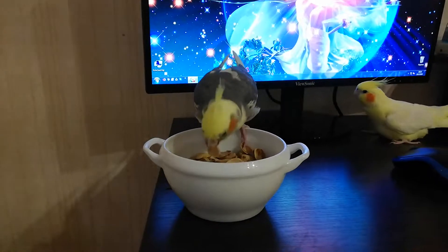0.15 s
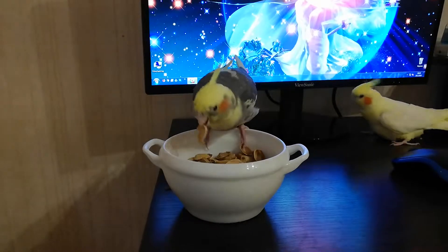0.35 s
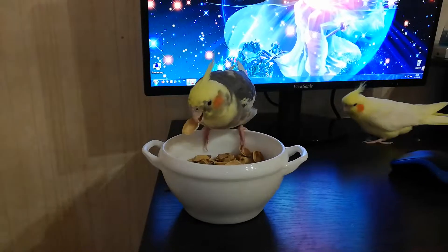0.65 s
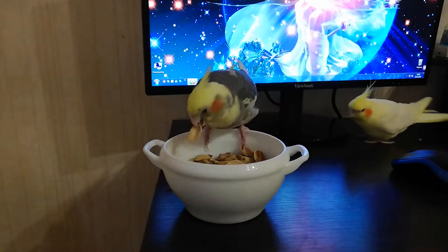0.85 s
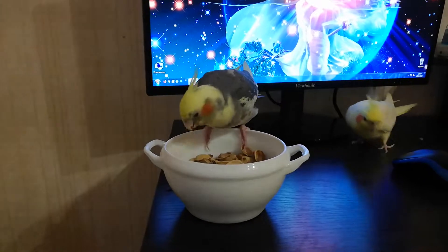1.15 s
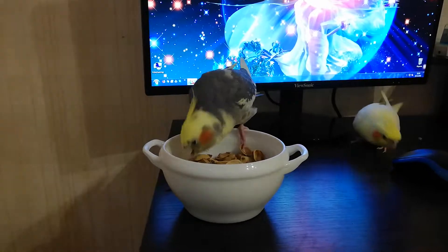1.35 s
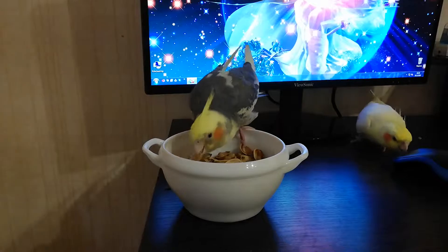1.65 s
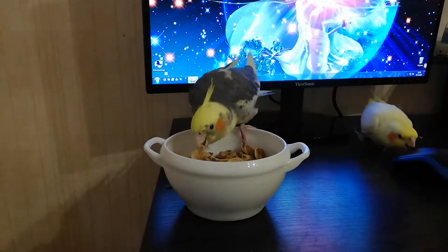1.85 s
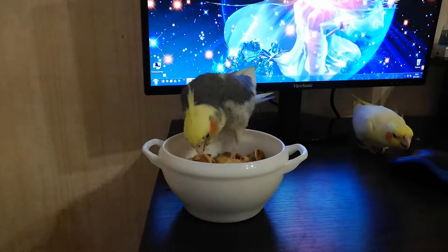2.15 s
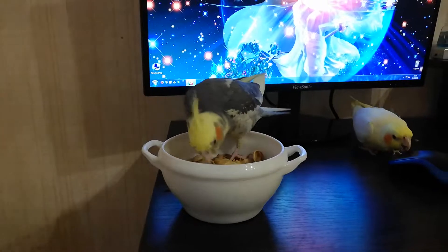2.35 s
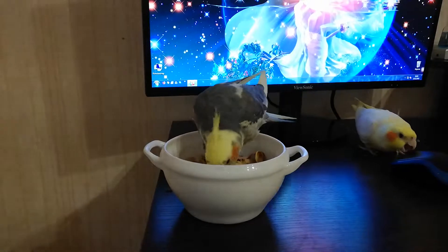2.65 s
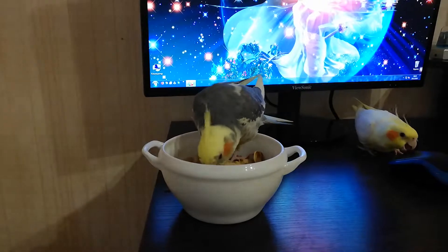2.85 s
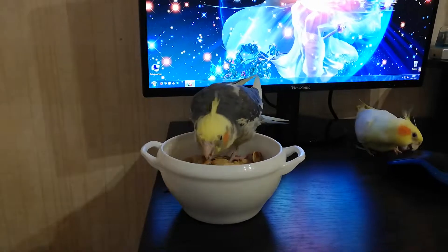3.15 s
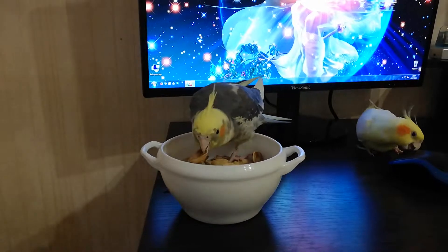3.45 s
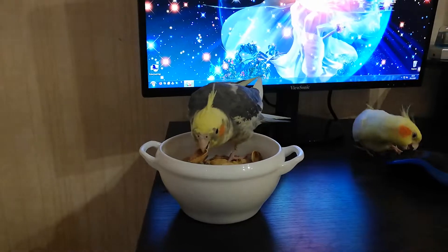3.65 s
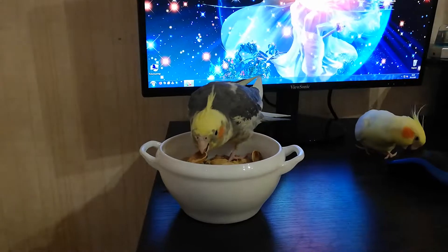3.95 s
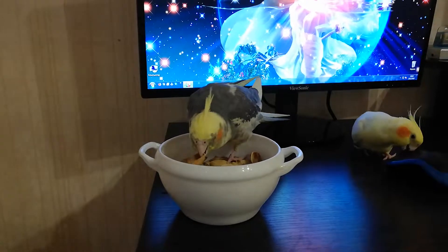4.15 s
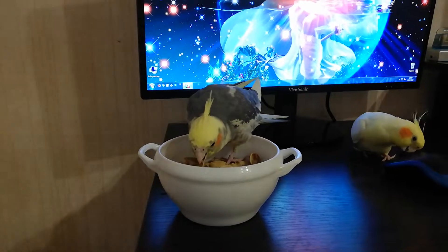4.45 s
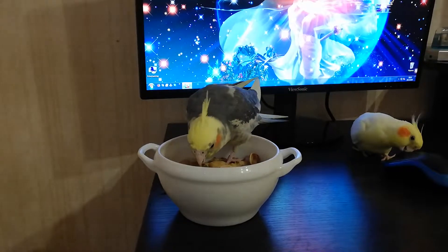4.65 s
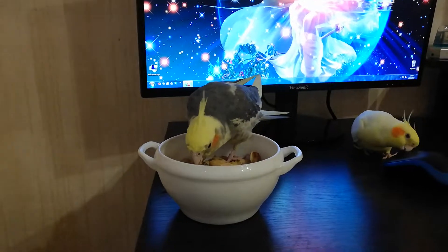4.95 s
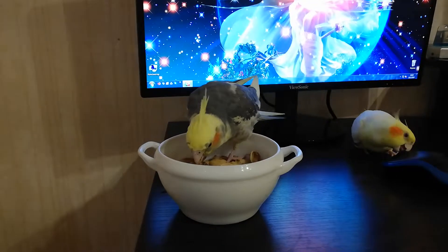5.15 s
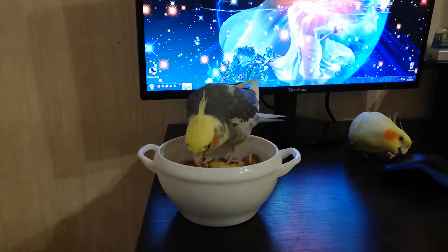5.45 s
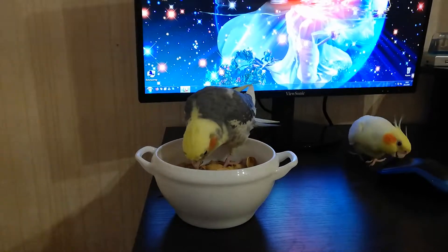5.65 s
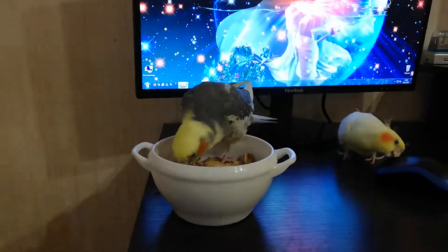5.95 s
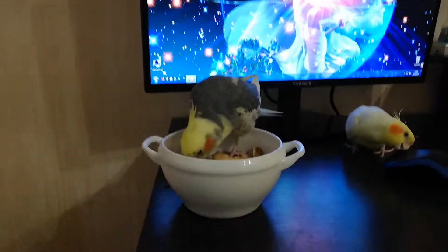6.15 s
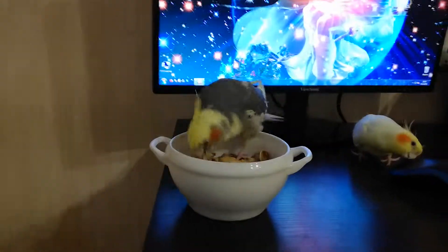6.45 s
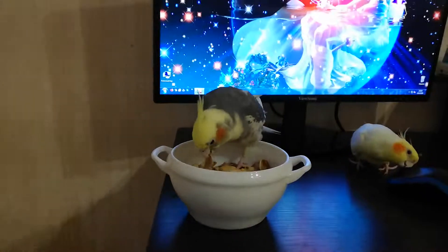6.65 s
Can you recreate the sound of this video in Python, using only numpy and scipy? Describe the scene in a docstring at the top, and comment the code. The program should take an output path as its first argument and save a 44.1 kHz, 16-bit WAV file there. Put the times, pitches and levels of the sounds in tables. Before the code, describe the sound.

Crisp beak cracks, grinding crumbs and faint glazed-bowl clinks in a quiet humming room, ending in thumps and scratchy rubs of handling.

```python
"""A small parrot cracks dry cereal over a glazed bowl on a desk: noise bursts crack, grains grind as crumbs,
and damped modes ring as its beak taps the rim. A hand-held phone hears the bird at its right port.
Near the left port fingers knock (damped swings), slip (noise bursts) and rub (grainy noise); the grip rumbles.
A second bird's steps are short noise bursts; fans hum and electronics whine as wavering sines in a small room.
"""
import sys
import numpy as np
from scipy import signal
from scipy.fft import rfft, irfft, next_fast_len
from scipy.io import wavfile
from scipy.ndimage import uniform_filter1d, map_coordinates

SR = 44100
rng = np.random.default_rng(int(sys.argv[2]) if len(sys.argv) > 2 else 0)


def boost_factor(decibels):
    """Convert a level in decibels to a linear amplitude factor."""
    exponent = np.asarray(decibels, float) / 20
    return 10 ** exponent


def to_wav(s):
    """Save 16-bit WAV."""
    ch = np.atleast_2d(s).T  # columns
    pcm = np.round(np.clip(ch, -1, 1) * 32767)  # PCM
    wavfile.write(sys.argv[1], SR, pcm.astype(np.int16))


N = 299880
TIME = np.arange(N) / SR

# tone of the room air: (frequency [Hz], relative level [dB])
AIR_TONE = [(53, -50), (90, -3.5), (215, -3.5), (404, -10.5), (461, -13.5), (866, -17), (3810, -23.5),
            (9920, -26.5), (16400, -31)]
# likeness of the air at the two ports: (frequency [Hz], correlation [-1 to 1])
AIR_LIKENESS = [(100, 0.82), (300, 0.37), (640, -0.54), (1400, -0.21)]
# tilt of the air between the ports: (frequency [Hz], left minus right [dB])
AIR_LEAN = [(300, 1), (700, -8), (3000, -1.5), (7000, -3), (11000, -14), (15500, -6)]
# computer fans: (frequency [Hz], central amplitude [dB])
FAN_HUM = [(118.4, -67), (161.5, -67.5), (209.9, -64.5)]
# whine of the electronics: (frequency [Hz], central amplitude at the right port [dB])
WHINE_TONES = [(6002, -79.5), (8000, -74.5), (10002, -77.5)]
# rumble of the hand's grip: (time [s], level [dB])
GRIP_RUMBLE = [(0, -60), (2.45, -64.5), (2.55, -55), (2.7, -63), (3.5, -62), (3.62, -50), (3.8, -63),
               (5.85, -57), (5.95, -38.5), (6.2, -40.5), (6.45, -45), (6.8, -60.5)]
# finger knocks on the case: (time [s], strength [dB], rocking frequency [Hz], push 1 or pull -1)
FINGER_KNOCKS = [(0.0855, -2.5, 77.5, -1), (0.101, -13, 71, -1), (0.1219, -9, 79, -1),
                 (0.159, -11, 76.5, -1), (0.5909, -12, 73.6, 1), (2.2406, -4, 74, 1),
                 (4.9234, -19.5, 47.4, -1), (5.3236, 0, 126, 1), (5.357, -15.5, 90, 1),
                 (5.4276, -7.5, 64, -1), (5.4478, -12, 64, -1), (5.4814, -7.5, 71, -1),
                 (5.5076, -9.5, 82.5, -1), (5.6345, -10.5, 75, -1), (5.676, -10, 54.3, -1),
                 (5.6899, -12, 86.4, 1), (5.7025, 0.5, 90.5, -1), (5.88, -13, 67.6, -1),
                 (5.9388, -10.5, 67.4, 1), (6.014, -4.5, 93, -1), (6.023, -5.5, 155, 1),
                 (6.0957, -13.5, 44.5, -1), (6.1092, -14, 55.3, 1), (6.293, 0.5, 110, 1),
                 (6.401, -19, 76, 1), (6.6173, -16, 71.4, 1)]
# crumbs grinding and rattling, ahead of the port: (start [s], end [s], level [dB])
CRUMB_STROKES = [(0.095, 0.276, -53.5), (1.188, 1.337, -42.5), (1.581, 1.742, -46.5), (2.122, 2.142, -29),
                 (2.209, 2.291, -34.5), (2.33, 2.5, -50), (2.645, 2.721, -43.5), (2.778, 3.01, -55.5),
                 (3.029, 3.124, -45.5), (3.121, 3.186, -40.5), (3.177, 3.32, -35), (3.456, 3.623, -58.5),
                 (4.174, 4.26, -53), (4.295, 4.36, -41.5), (4.464, 4.512, -53), (4.552, 4.623, -55.5),
                 (4.63, 4.726, -43), (5.92, 6.03, -56.5), (6.328, 6.39, -41), (6.443, 6.669, -50)]
# beak taps on the glaze: (time [s], strength [dB])
BEAK_TAPS = [(2.154, -44), (2.247, -39.5), (3.188, -28), (3.245, -46), (4.632, -50.5)]
# ringing modes of the bowl: (frequency [Hz], strength [dB], t60 [s])
BOWL_MODES = [(1463, -25, .12), (3833, -8, 0.17), (6530, 5.5, 0.073), (9700, 1.5, 0.096), (10700, 3, 0.097)]
# shell cracks, ahead of the port: (time [s], peak level [dB])
SHELL_CRACKS = [(0.1832, -22), (.254, -31.5), (1.191, -4.5), (1.2002, -15.5), (1.204, -11), (1.214, -23),
                (1.38, -35), (1.5795, -36), (1.602, -32), (1.646, -27), (1.692, -27), (1.7862, -31.5),
                (1.815, -35), (2.154, -30), (2.1614, -15), (2.1894, -4), (2.2155, -22), (2.241, -22),
                (2.2477, -19), (2.376, -19.5), (2.4486, -22), (2.6695, -22), (3.0552, -22.5),
                (3.1649, -20.5), (3.1852, -7), (3.27, -25), (3.578, -31), (4.1728, -12), (4.2227, -22.5),
                (4.275, -26), (4.313, -19), (4.332, -18.5), (4.6284, -16), (4.6373, -18.5), (6.492, -36),
                (6.505, -32), (6.531, -30), (6.6035, -29)]
# a soft puff in two colours: (start [s], end [s], level [dB], colour [Hz])
SOFT_PUFF = [(.61, .74, -50.5, 13400), (.62, .75, -58.5, 3540)]
# second bird's feet on the desk, ahead of the port: (time [s], peak level [dB])
FOOTSTEPS = [(1.726, -48), (1.79, -50), (1.907, -46), (2.351, -45), (3.535, -46.5), (3.99, -50.5)]
# skin slipping near the left port: (time [s], peak level [dB], colour [Hz])
SKIN_SLIPS = [(2.241, -29, 1400), (5.3235, -22, 1490), (5.3496, -21, 2600), (5.52, -31, 2000),
              (5.6563, -23.5, 2200), (5.6595, -21, 905), (5.6848, -20, 1850), (5.69, -14, 2400),
              (5.694, -14, 1800), (5.697, -14, 3200), (5.699, -13.5, 1200), (5.7046, -11, 3200),
              (5.7069, 1.5, 1600), (5.7094, -6.5, 1800), (5.715, -13, 4000), (5.7196, -15.5, 3000),
              (5.7395, -28, 2200), (5.7882, -12, 8040), (5.8764, -25.5, 6900), (5.92, -29, 1500),
              (5.928, -27.5, 1500), (5.935, -25, 1000), (5.9419, -19.5, 870), (5.951, -25, 1500),
              (6.0109, -12.5, 1310), (6.0175, -14, 2300), (6.0844, -17.5, 4000), (6.09, -21.5, 3500),
              (6.2519, -17, 1960), (6.2568, -17, 2400), (6.295, 0, 1800), (6.3304, -14, 3000),
              (6.3334, -12, 1000), (6.354, -23, 2200), (6.363, -5, 3000), (6.3827, -21.5, 1060)]
# fingertip rubbing: (start [s], end [s], level [dB], colour [Hz])
FINGER_RUBS = [(5.335, 5.37, -51.5, 2570), (5.515, 5.61, -52.5, 3600), (5.668, 5.73, -28, 3600),
               (5.67, 5.79, -43, 9700), (5.775, 5.795, -37, 9700), (5.86, 5.97, -55.5, 6950),
               (5.92, 6.0, -41, 1600), (5.98, 6.016, -30, 2100), (6.01, 6.06, -47, 2980),
               (6.062, 6.102, -34, 4000), (6.09, 6.23, -52.5, 1830), (6.2, 6.3, -42, 2900),
               (6.305, 6.41, -38, 3100)]
# resonances of the right port: (frequency [Hz], sharpness Q, gain [dB])
PORT_RESONANCES = [(8310, 13, -6), (10130, 12, -4)]
# decay of the room: (frequency [Hz], t60 [s])
ROOM_DECAY = [(1000, 0.98), (6000, 0.3), (14000, 0.26)]


def unit(x):
    """Scaled to rms 1."""
    return x / np.sqrt(np.mean(x ** 2) + 1e-20)


def along(points, hz):
    """(Hz, value) points read on a log frequency axis."""
    f, v = np.transpose(points)
    return np.interp(np.log(hz + 1), np.log(f + 1), v)


def wobble(rate):
    """A smooth random curve with rate knots a second, 40 at most."""
    knots = rng.standard_normal(int(N * 40 / SR) + 4)
    return map_coordinates(knots, [TIME * min(rate, 40)])


def filtered(x, response):
    """x shaped by a complex response of frequency."""
    m = next_fast_len(x.shape[-1] + 8192)
    spectrum = rfft(x, m) * response(np.fft.rfftfreq(m, 1 / SR))
    return irfft(spectrum, m)[..., :x.shape[-1]]


def resonance(hz, q):
    """A causal band around hz."""
    return lambda f: 1j * f * hz / q / (hz * hz - f * f + 1j * f * hz / q)


def hollow(hz, q):
    """A causal low-pass with a hump at hz; the slowest pressure leaks away."""
    def response(f):
        hump = hz * hz / (hz * hz - f * f + 1j * f * hz / q)
        leak = 1j * f / (260 + 1j * f)
        return hump ** .72 * np.sqrt(leak)
    return response


def heaped(hz, q):
    """A broad band at hz over the lower body of the heap of food in the bowl."""
    return lambda f: resonance(hz, q)(f) + .3 * resonance(3950, 2.2)(f)


def add(track, s, sound):
    """Mixes a sound in at a time in seconds."""
    start = round(s * SR)
    track[start:start + len(sound)] += sound[:len(track) - start]


def bursts(rows, band, q, snap):
    """A snap and a dying, ragged noise through a broad band, one for each (s, dB, Hz, t60 s) row."""
    track, t = np.zeros(N), np.arange(SR // 10) / SR
    for s, db, hz, t60 in rows:
        noise, luck = rng.standard_normal((2, len(t)))
        # the strength jumps every 32 samples
        ragged = noise * np.exp(.5 * np.repeat(luck, 32)[:len(t)])
        push = ragged * boost_factor(-60 * t / t60) + snap * (t == 0)
        sound = filtered(push, lambda f: band(hz, q)(f) ** 2)
        add(track, s, -boost_factor(db) * sound / np.abs(sound).max())
    return track


def swells(rows, band, rate, spread_db, share, q, skew, patchy_db):
    """Strokes of dense, unequal grains over plain noise, one for each (start s, end s, dB, Hz) row."""
    when, noise = rng.random(N), rng.standard_normal((2, N))
    size = np.minimum(rng.exponential(size=N), 3)
    clicks = unit((when < rate / SR) * np.sign(noise[0]) * boost_factor(spread_db * size))
    z = signal.stft(clicks + share * noise[1], nperseg=128)[2]
    # each clump of grains has its own pitch: patches some 2 kHz wide and 7 ms long
    field = uniform_filter1d(rng.standard_normal(z.shape), size=6, axis=0)
    field = uniform_filter1d(field, size=5, axis=1)
    stream = signal.istft(z * boost_factor(patchy_db * unit(field)), nperseg=128)[1]
    track = np.zeros(N)
    for start, end, db, hz in rows:
        piece = stream[round(start * SR):round(end * SR)]
        shape = np.sin(np.pi * np.linspace(0, 1, len(piece)) ** skew) ** 1.2
        coloured = unit(filtered(piece, lambda f: band(hz, q)(f) ** 2))
        add(track, start, boost_factor(db) * shape * coloured)
    return track


def ports(near, lag_s, corner_hz, steepness):
    """Near and far port: the case delays and dulls the sound on its way round."""
    def way_round(f):
        return np.exp(-2j * np.pi * f * lag_s) / (1 + 1j * f / corner_hz) ** steepness
    return np.array([near, filtered(near, way_round)])


def room_air():
    """Noise much alike at both ports in the bass and partly opposed in the middle, with a tilt between them."""
    def mid_side(f):
        turn = np.arccos(np.clip(along(AIR_LIKENESS, f), -1, 1)) / 2
        return boost_factor(along(AIR_TONE, f)) * (f > 60) * [np.cos(turn), np.sin(turn)]
    mid, side = filtered(rng.standard_normal((2, N)), mid_side)
    pair = np.array([mid + side, mid - side])
    pair = filtered(pair, lambda f: boost_factor(along(AIR_LEAN, f) * [[.5], [-.5]]))
    return boost_factor(-58.5 + 0.23 * wobble(2.76)) * unit(pair)


def wavering_tones(tones, drift_db, drift_rate, phase_drift, phase_rate):
    """Sines whose level [dB] and phase [rad] wander at random."""
    return sum(boost_factor(db + drift_db * wobble(drift_rate))
               * np.sin(2 * np.pi * hz * TIME + phase_drift * wobble(phase_rate)) for hz, db in tones)


def fans():
    """Computer fans: low tones that waver widely, equal at both ports."""
    return wavering_tones(FAN_HUM, 3.06, 8, 1.3, 9)


def electronics():
    """High, steadier tones, ten times weaker at the left port."""
    return wavering_tones(WHINE_TONES, 0.91, 2.2, 0.27, 11) * [[.1], [1]]


def grip():
    """The hand's unrest: a low band of noise with a fluttering level."""
    unrest = unit(filtered(rng.standard_normal(N), lambda f: resonance(45, .8)(f) ** 2))
    level_db = np.interp(TIME, *np.transpose(GRIP_RUMBLE))
    return boost_factor(level_db + 4 * wobble(18)) * unrest


def knocks():
    """A knock rocks the phone: a quick first swing, a slower rebound, gone in two cycles, with a faint tick."""
    track, t = np.zeros(N), np.arange(SR // 15) / SR
    for s, db, hz, direction in FINGER_KNOCKS:
        cycles = hz * t
        phase = cycles + 0.36 * (1 - np.exp(-cycles / 0.11))
        envelope = np.exp(-cycles / 0.32) * (1 - np.exp(-cycles / 0.42))
        swing = np.sin(2 * np.pi * phase) * envelope
        late = t - .0012
        tick = boost_factor(-35) * np.cos(2 * np.pi * 1500 * late) * np.exp(-(late / 0.00033) ** 2)
        add(track, s, np.sign(direction) * boost_factor(db) * (swing + tick))
    return track


def grinding():
    """Crumbs grind and rattle as dense grains; louder strokes are brighter."""
    usual_hz, usual_db, oct_per_db = 8770, -44.5, 0.05
    rows = [(start, end, db, usual_hz * 2 ** (oct_per_db * (db - usual_db))) for start, end, db in CRUMB_STROKES]
    return swells(rows, heaped, rate=1200, spread_db=3.5, share=0.4, q=1.01, skew=0.54, patchy_db=4.0)


def bowl(crumbs):
    """Crumbs keep the modes faintly ringing; taps strike them unequally, and loose food roughens the tone."""
    def modes(f):
        # sharpness that gives each mode its t60
        return sum(resonance(hz, np.pi * hz * t60 / np.log(1000))(f) for hz, _, t60 in BOWL_MODES)
    track, t = np.zeros(N), np.arange(SR // 3) / SR
    for s, db in BEAK_TAPS:
        for hz, mode_db, t60 in BOWL_MODES:
            level_db = db + mode_db + 2 * rng.standard_normal() - 60 * t / t60
            rough_phase = 2 * np.pi * hz * t + .042 * np.cumsum(rng.standard_normal(len(t)))
            onset = 1 - np.exp(-t / 0.0013)
            add(track, s, boost_factor(level_db) * onset * np.sin(rough_phase))
    rattle_db = 5.5
    return track + boost_factor(rattle_db) * filtered(crumbs, modes)


def cracks():
    """Shells snap as short noise bursts, brighter when harder; faint nibbles fall at random moments."""
    hardest_hz, oct_per_db, t60_s = 9900, .012, .011  # colour of a 0 dB crack
    nibbles_per_s, nibble_db, nibble_spread_db = 8, -46, 8
    luck = rng.random((round(nibbles_per_s * N / SR), 2))
    nibbles = [(when * N / SR, nibble_db + nibble_spread_db * size) for when, size in luck]
    rows = [(s, db, hardest_hz * 2 ** (oct_per_db * db), t60_s) for s, db in [*SHELL_CRACKS, *nibbles]]
    return bursts(rows, resonance, q=1.3, snap=3)


def puff():
    """A soft swell of mostly plain noise in a high and a lower band."""
    return swells(SOFT_PUFF, resonance, rate=900, spread_db=1.0, share=1.5, q=1.7, skew=0.41, patchy_db=2.5)


def steps():
    """The second bird's feet thud on the desk as dull noise bursts."""
    hz, t60_s = 940, .2
    return bursts([(s, db, hz, t60_s) for s, db in FOOTSTEPS], resonance, q=0.74, snap=1.5)


def slips():
    """Skin slips: very short noise bursts with a sharp snap."""
    t60_s = .0035
    return bursts([(s, db, hz, t60_s) for s, db, hz in SKIN_SLIPS], hollow, q=0.9, snap=5.5)


def rubbing():
    """A fingertip rubs: grainy noise under a rising and falling level."""
    return swells(FINGER_RUBS, hollow, rate=900, spread_db=2.5, share=1.1, q=1.2, skew=1.05, patchy_db=3)


def hand():
    """Knocks and grip shake both ports; slips and rubs sit at the left one."""
    shaking = ports(knocks() + grip(), lag_s=.0006, corner_hz=394, steepness=0.39)
    skin = ports(slips() + rubbing(), lag_s=0.00045, corner_hz=486, steepness=1.37)
    return shaking + skin


def birds():
    """Both birds through the right port; its mesh dulls the highest treble and dips near 5 kHz; the puff skips it."""
    def port(f):
        return .76 + sum(boost_factor(db) * resonance(hz, q)(f) for hz, q, db in PORT_RESONANCES)

    def mesh(f):
        return (1 - .55 * resonance(5200, 3.5)(f)) / np.sqrt(1 + (f / 11800) ** 13)
    crumbs = grinding()
    food = filtered(cracks() + crumbs, port)
    return filtered(food + bowl(crumbs) + steps(), mesh) + puff()


def room(x):
    """Each quarter second of sound gets its own tail in which each frequency dies at its own speed."""
    out, piece = np.zeros((N, 2)), SR // 4
    for start in range(0, N, piece):
        hz, t, z = signal.stft(rng.standard_normal((2, SR // 3)), SR, nperseg=256)
        decay = boost_factor(-60 * t / along(ROOM_DECAY, hz)[:, None])
        tail = signal.istft(z * decay, SR, nperseg=256)[1]
        wet = signal.fftconvolve(x[None, start:start + piece], tail / np.linalg.norm(tail[0]), axes=1)
        add(out, start / SR + .004, wet.T)  # the tail sets in 4 ms late
    return out.T


def scene():
    """The birds at the right port, the hand at the left, both in the room's air."""
    eating = birds()
    direct = ports(eating, lag_s=0.00069, corner_hz=2000, steepness=5.4)[::-1]  # right port is the near one
    reverb = boost_factor([[-30], [-9]]) * room(eating)  # left, right
    return direct + reverb + hand() + room_air() + fans() + electronics()


def low_pass(x):
    """Removes everything above the highest recorded frequency."""
    return signal.sosfilt(signal.butter(12, 16510, fs=SR, output="sos"), x)


def record(dry):
    """Gain control ducks around the loudest bursts and slowly recovers; a steep filter limits the band."""
    threshold, recovery_s, depth, lead = .3, .15, 300, 600  # ducking leads the burst by 600 samples
    excess = np.maximum(np.abs(dry).max(0) - threshold, 0)
    keep = np.exp(-1 / (recovery_s * SR))
    memory = signal.lfilter([1 - keep], [1, -keep], np.roll(excess, -lead))
    ducked = dry / (1 + depth * memory)
    limited = filtered(ducked, lambda f: 1 / (1 + (f / 15850) ** 80))
    return low_pass(limited)


dry = scene()
out = record(dry)
to_wav(out)
```